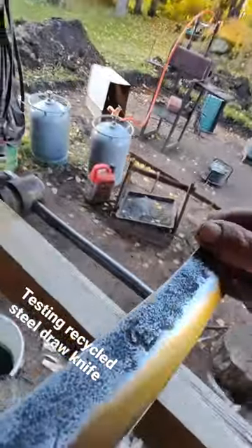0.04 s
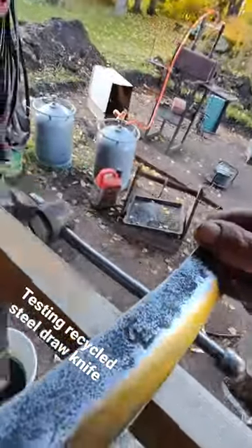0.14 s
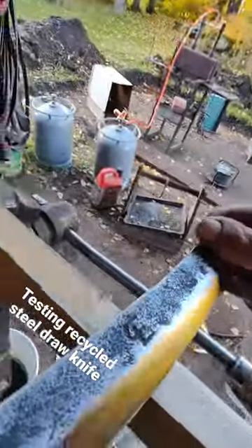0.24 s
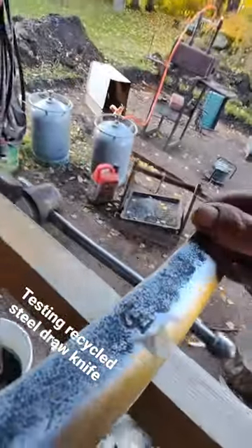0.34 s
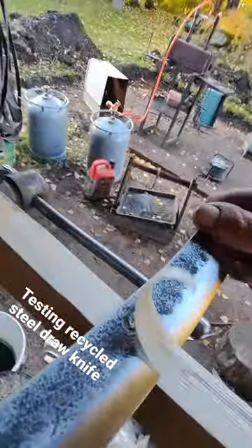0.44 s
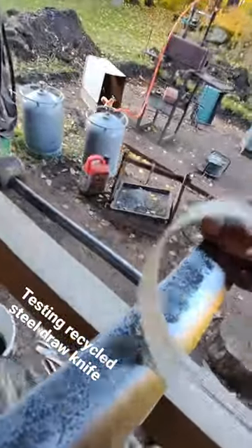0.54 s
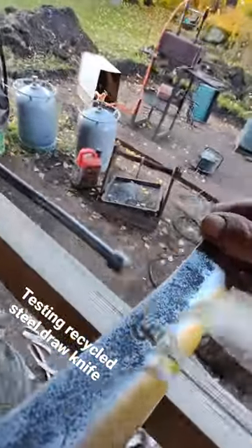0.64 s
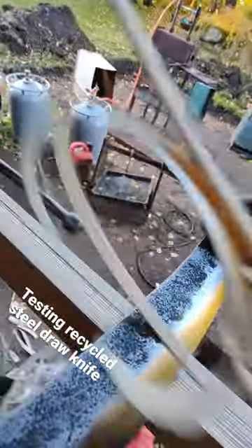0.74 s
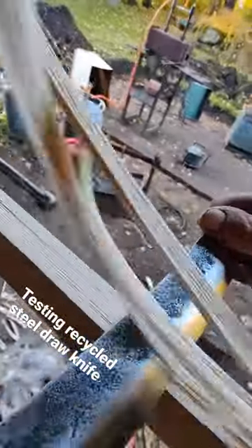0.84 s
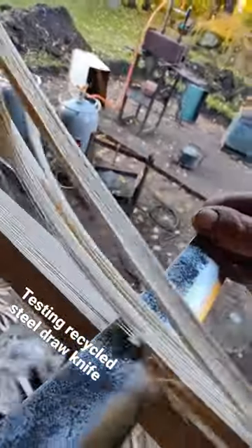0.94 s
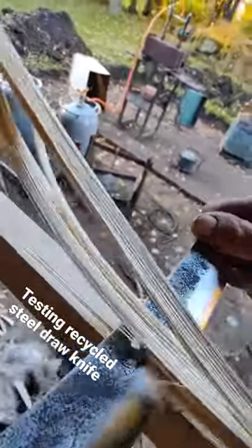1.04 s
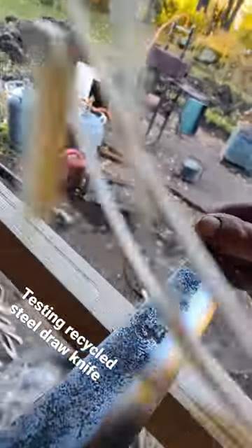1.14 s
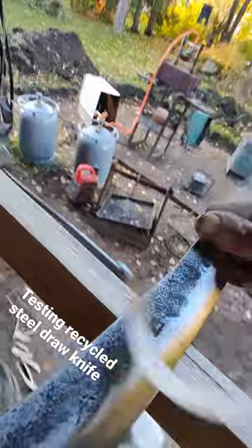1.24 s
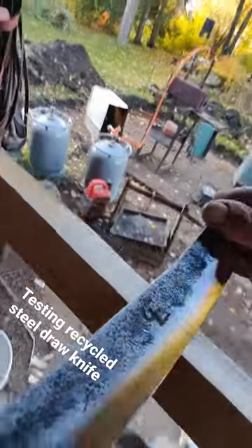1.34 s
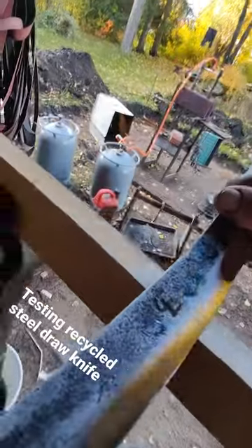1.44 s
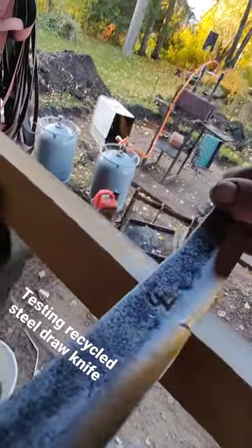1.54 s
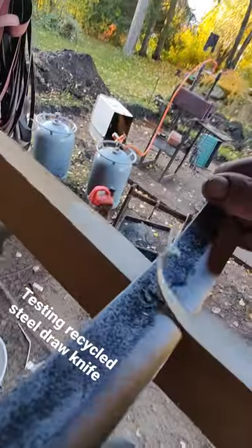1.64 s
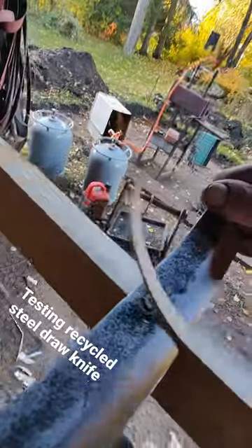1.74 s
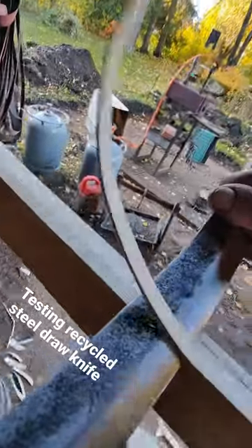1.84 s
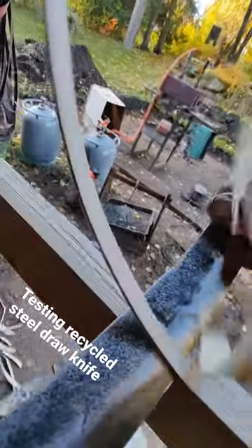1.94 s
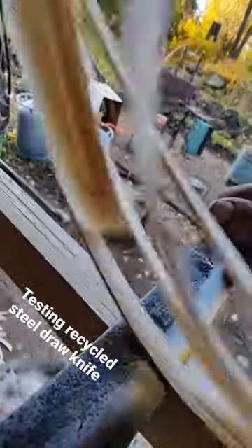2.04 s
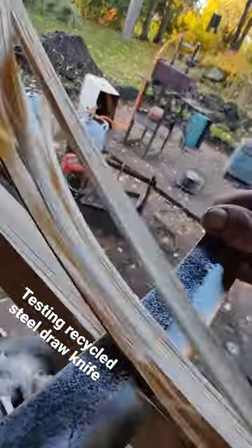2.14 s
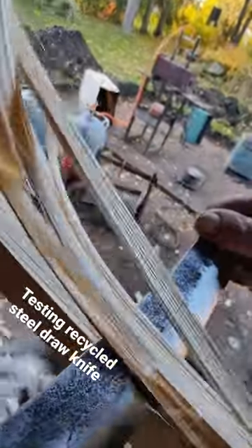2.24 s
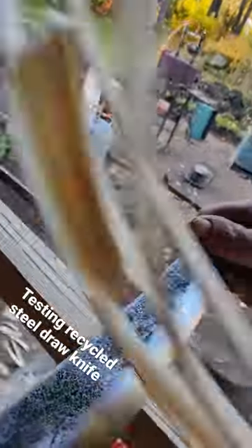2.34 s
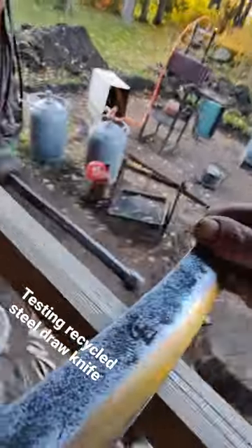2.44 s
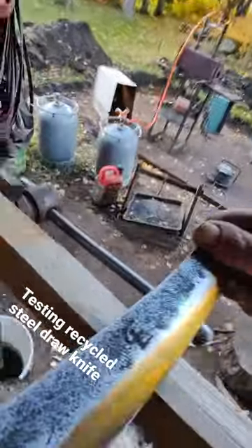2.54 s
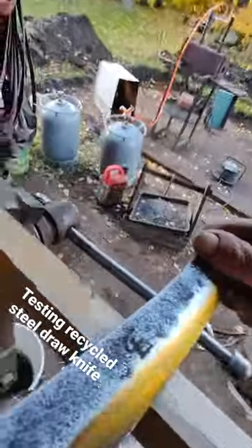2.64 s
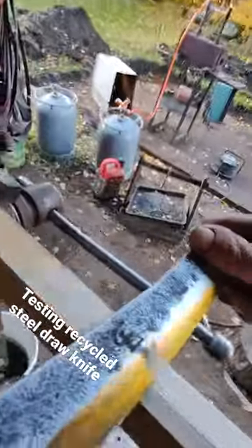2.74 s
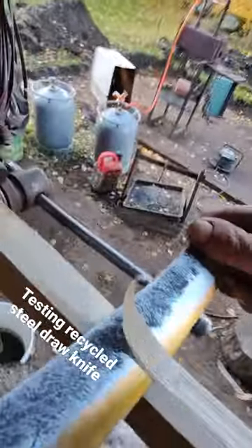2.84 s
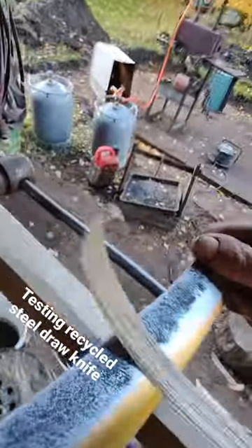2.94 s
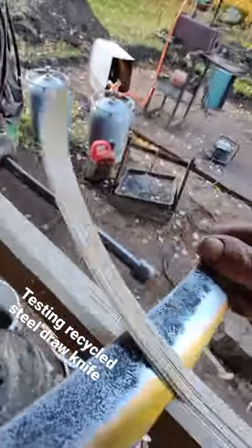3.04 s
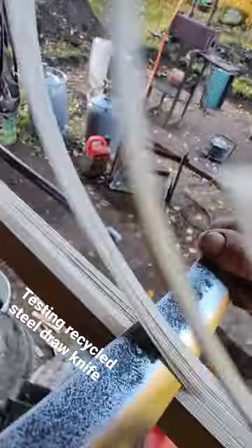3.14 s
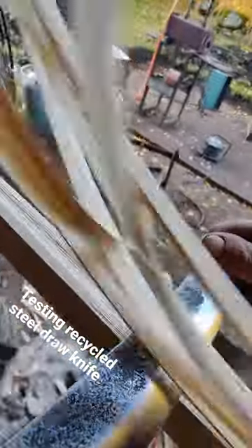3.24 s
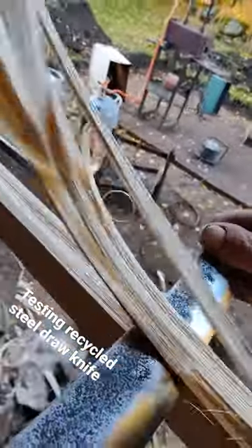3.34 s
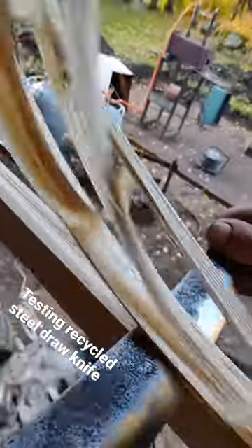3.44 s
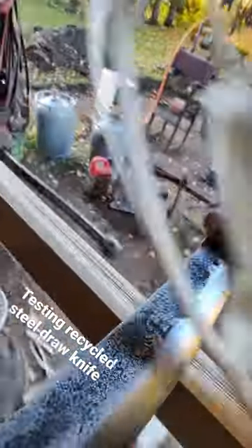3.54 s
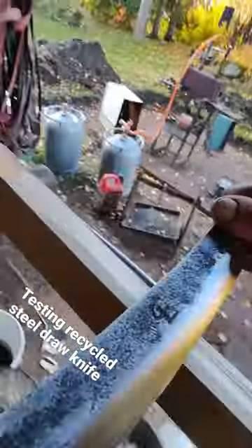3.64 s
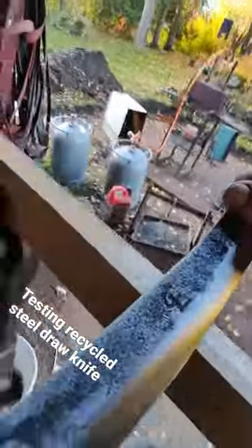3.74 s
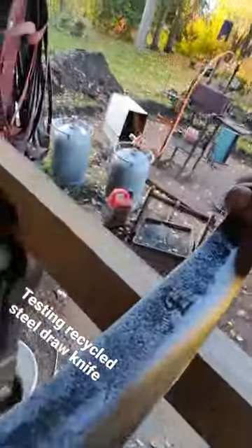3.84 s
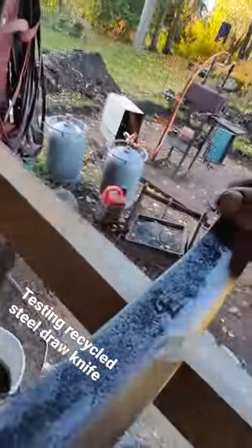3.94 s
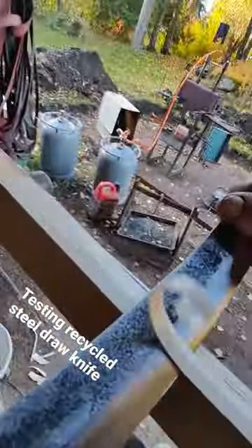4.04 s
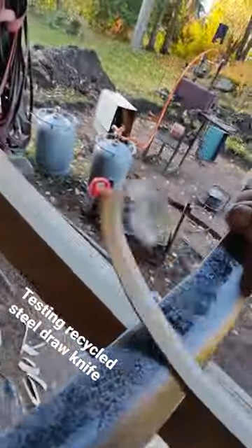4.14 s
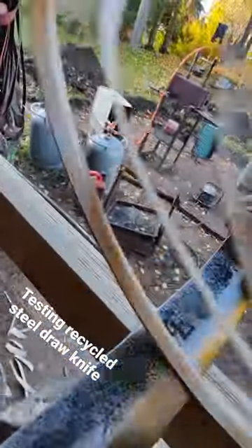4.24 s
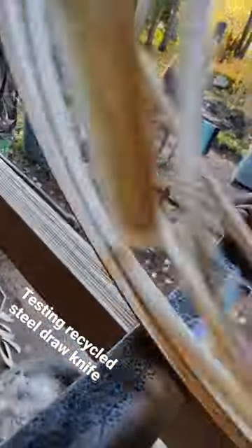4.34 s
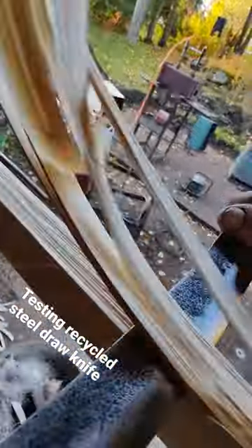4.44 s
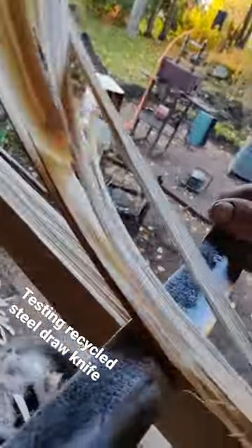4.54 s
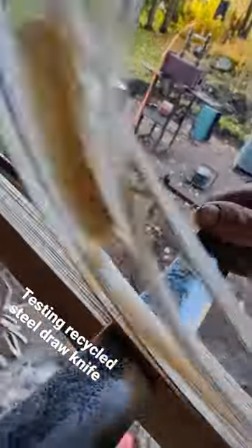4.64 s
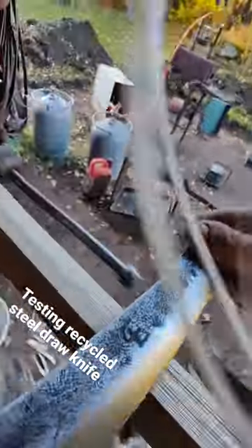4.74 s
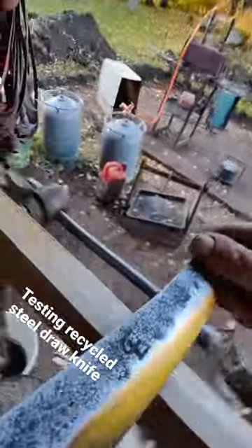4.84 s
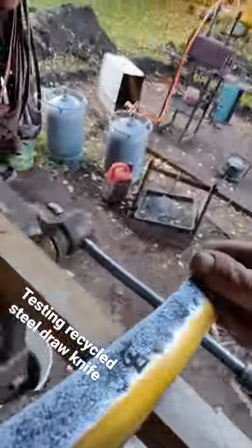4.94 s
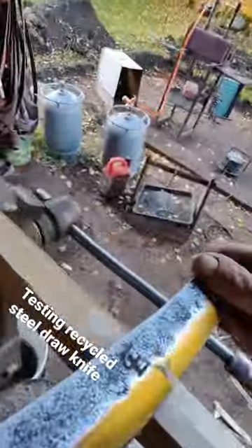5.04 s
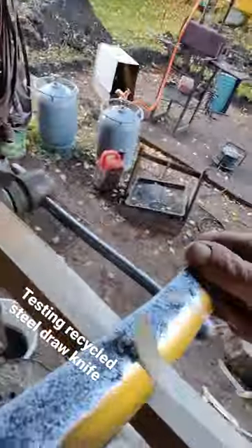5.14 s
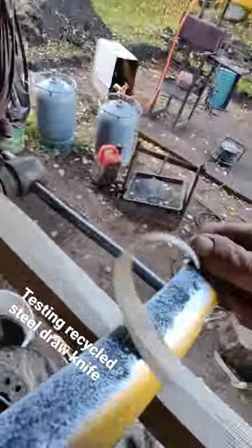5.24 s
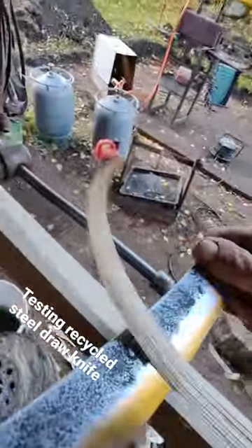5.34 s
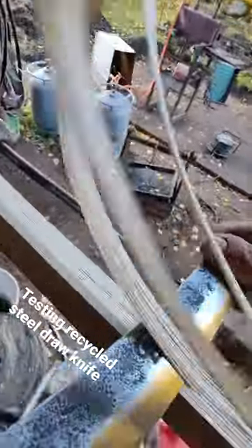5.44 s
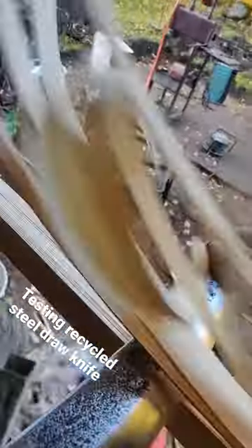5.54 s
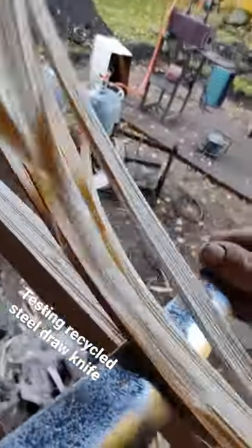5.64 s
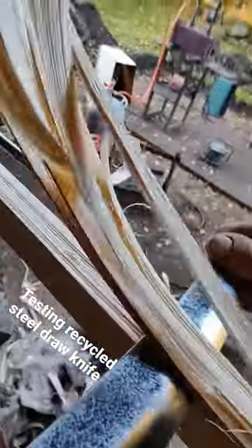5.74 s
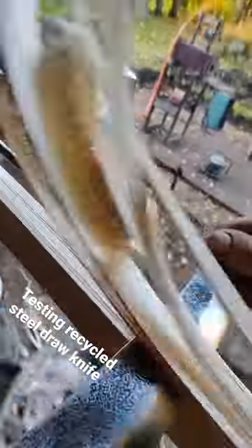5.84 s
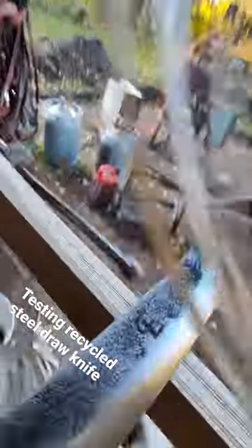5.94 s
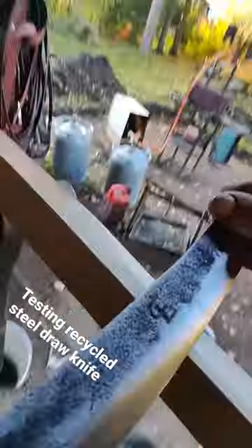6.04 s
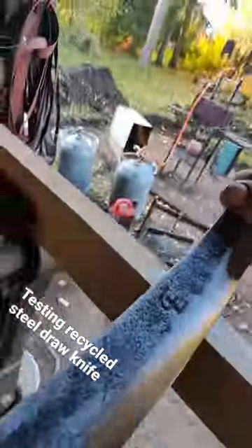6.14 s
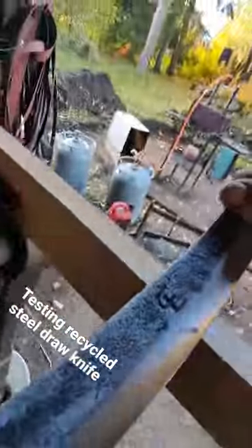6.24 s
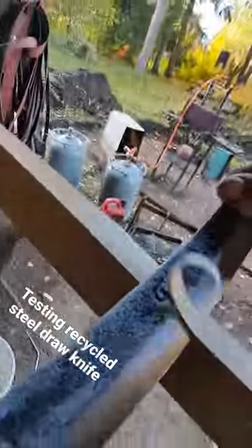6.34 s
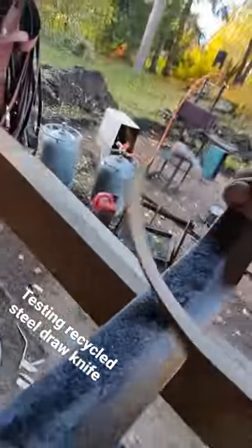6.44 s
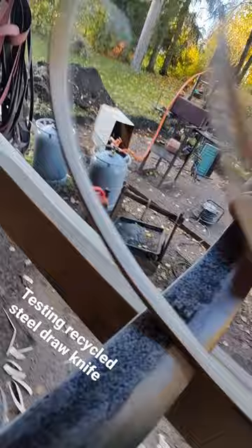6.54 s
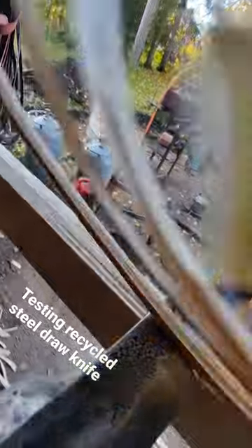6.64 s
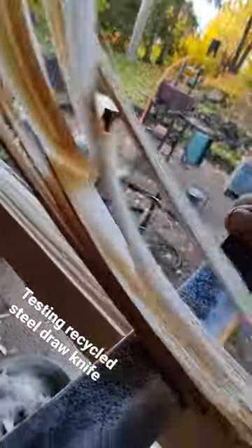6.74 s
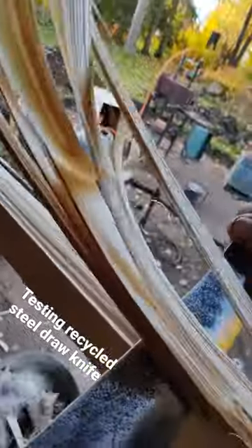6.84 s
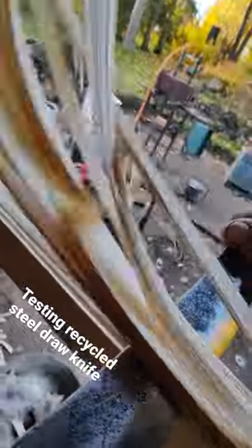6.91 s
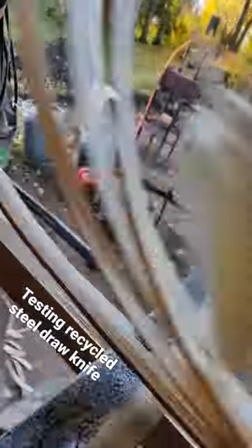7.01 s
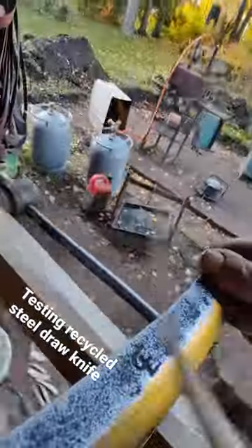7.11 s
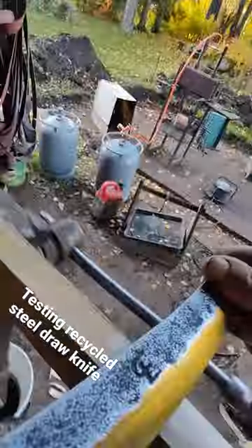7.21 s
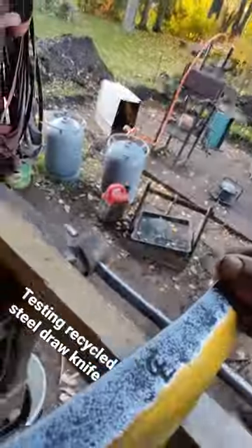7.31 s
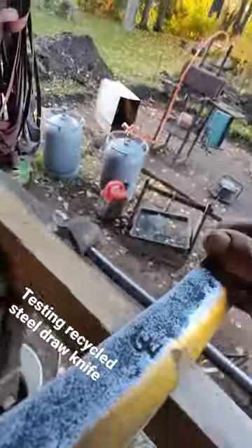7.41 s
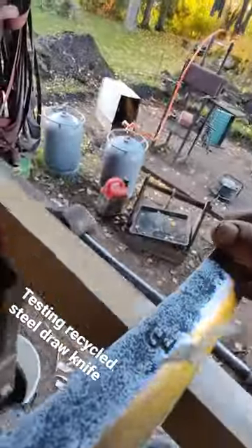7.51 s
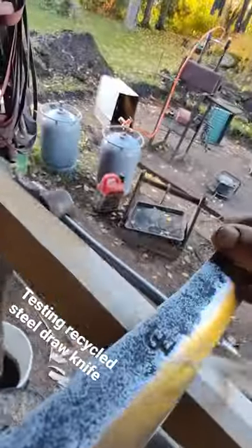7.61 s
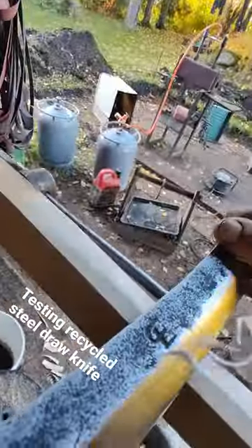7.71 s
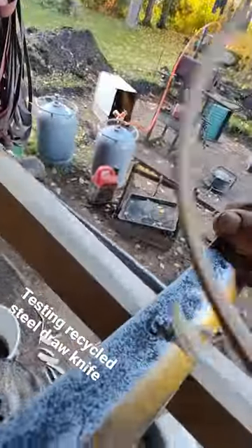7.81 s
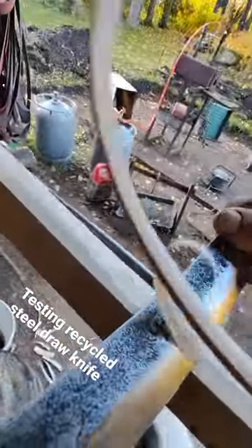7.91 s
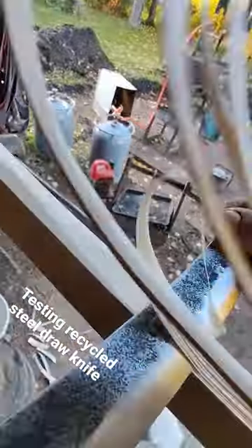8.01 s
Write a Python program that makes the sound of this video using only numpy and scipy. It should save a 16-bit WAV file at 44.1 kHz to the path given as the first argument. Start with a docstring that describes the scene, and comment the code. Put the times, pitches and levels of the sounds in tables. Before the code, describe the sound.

Outdoors, close and dry, a draw knife shaves wood in a steady rhythm, roughly one stroke every 1.2 seconds. Each gritty pull swells into bright ripping and crackling, then stops abruptly. Shavings brush and thump the microphone, the beam knocks, and the blade squeaks briefly. Quieter backward rubs fill the gaps, and the last stroke barely scrapes.

```python
"""A steel draw knife works a clamped wooden beam outdoors, right in front of the microphone.
It first slides back with a dull rub of sliding friction, as again between the later pulls; knocks ring the beam.
Then come seven pulls: stick-slip friction scrapes and judders. In the first six the edge also cuts: fibres tear
as noise bursts, the shaving sings in two drifting modes and splinters snap as ticks with damped rings.
From the first pull on, shavings bump the microphone and rustle; later blade or beam squeaks. The last pull is weak."""
import sys
import numpy as np
from scipy import signal
from scipy.fft import rfft, irfft, next_fast_len
from scipy.io import wavfile
from scipy.ndimage import map_coordinates

SR = 44100
rng = np.random.default_rng(int(sys.argv[2]) if len(sys.argv) > 2 else 0)


def master(y):
    """Save y as 16-bit WAV."""
    cut = np.clip(np.atleast_2d(y).T, -1, 1)
    pcm = np.round(cut * 32767)  # scale
    wavfile.write(sys.argv[1], SR, pcm.astype(np.int16))


N = 355887

# All levels in the tables are relative: each function adds its own trim.


def amp(db):
    """Level law: decibels to amplitude gain."""
    return 10 ** (np.asarray(db) / 20)


def unit(pair):
    """Normalisation: scale a stereo pair so that its centre has rms 1."""
    return pair / np.sqrt(np.mean(pair.mean(0) ** 2) + 1e-20)


def along(points, hz):
    """Logarithmic frequency axis: interpolate (f/Hz, value) points."""
    f, v = np.transpose(points)
    return np.interp(np.log(hz + 1), np.log(f), v)


def pan(db):
    """Intensity stereo: left and right gains, of mean 1, for a left-minus-right level in dB."""
    g = np.array([amp(db / 2), amp(-db / 2)]).reshape(2, -1)
    return g / g.mean(0)


def since(s):
    """Time origin: seconds since time s, for each sample."""
    return np.arange(N) / SR - s


def wobble(rate):
    """Band-limited fluctuation: a smooth random curve, rate knots a second."""
    knots = rng.standard_normal(int(N * rate / SR) + 4)
    return map_coordinates(knots, [np.arange(N) * rate / SR])


def filtered(x, response):
    """Linear filtering: multiply the spectrum by a response of frequency."""
    size = next_fast_len(N + 8192)
    hz = np.fft.rfftfreq(size, 1 / SR)
    return irfft(rfft(x, size) * response(hz), size)[..., :N]


def struck(x, spectrum):
    """Minimum phase: a causal colour of unit energy, so that nothing sounds before the blow."""
    hz = np.fft.rfftfreq(2048, 1 / SR)
    cepstrum = irfft(np.log(amp(along(spectrum, hz))))
    cepstrum[1:1024] *= 2  # fold the negative times onto the positive ones
    cepstrum[1025:] = 0
    ring = irfft(np.exp(rfft(cepstrum)))
    return signal.fftconvolve(x, ring[None] / np.linalg.norm(ring), axes=1)[:, :N]


# Correlation between left and right: (f/Hz, coefficient from -1 to 1)
PORT_CORRELATION = [(60, 0.13), (350, -0.68), (600, 0.21), (1050, 0.47), (1600, 0.23), (2400, -0.45),
                    (3600, -0.1), (5000, 0.017)]


def voiced(pair, spectrum, side, modes=()):
    """Source-filter principle: two excitations, coloured by a spectrum and modes, reach two partly alike ports."""
    def colour(hz):
        ring = sum(amp(db) * 1j * hz * w / (c * c - hz * hz + 1j * hz * w) for c, w, db in modes)
        fading = np.abs(ring) / (1 + (hz / 8000) ** 8)  # the modes fade in the high treble
        return np.hypot(amp(along(spectrum, hz)), fading)

    def mid_and_wide(hz):
        turn = np.arccos(np.clip(along(PORT_CORRELATION, hz), -1, 1)) / 2
        return colour(hz) * np.array([np.cos(turn), np.sin(turn)])

    mid, wide = filtered(pair, mid_and_wide)
    ports = np.array([mid + wide, mid - wide])
    return unit(filtered(ports, lambda hz: pan(along(side, hz))))


def slips(rate, spread_db, life, smooth):
    """Stick-slip: rate bursts a second, of uneven size, decaying over life s, plus smooth friction power."""
    happens = rng.random(N) < rate / SR
    sizes = happens * amp(spread_db * rng.standard_normal(N).clip(-2.4, 2.4))
    power = signal.lfilter([1], [1, -np.exp(-2 / (life * SR))], sizes ** 2)
    return np.sqrt(power / power.mean() + smooth) * rng.standard_normal((2, N))


def shifting(pair, cell_hz, rate, depth_db):
    """Moving contact: resonances come and go as the edge travels along the wood."""
    hz, t, z = signal.stft(pair, SR, nperseg=1024)
    knots = rng.standard_normal((int(hz[-1] / cell_hz) + 3, int(t[-1] * rate) + 3))
    field = map_coordinates(knots, np.meshgrid(hz / cell_hz, t * rate, indexing="ij"), order=1)
    return unit(signal.istft(z * amp(depth_db * field.clip(-2, 2)), SR, nperseg=1024)[1][:, :N])


def add(track, s, sound):
    """Superposition: mix a short stereo sound in at time s."""
    part = track[:, max(round(s * SR), 0):][:, :sound.shape[1]]
    part += sound[:, :part.shape[1]]


def burst(t60, tail_db, tail_t60):
    """Two-stage decay: a sharp stereo noise burst with a weaker, longer tail."""
    t = np.arange(SR // 5) / SR
    decay = amp(-60 * t / t60) + amp(tail_db - 60 * t / tail_t60)
    return decay * rng.standard_normal((2, len(t)))


def ping(hz, t60):
    """Damped oscillator: one mode, reaching the two ports in unrelated phase."""
    t = np.arange(SR // 5) / SR
    onset = 1 - np.exp(-2 * hz * t)
    return np.sin(2 * np.pi * (hz * t + rng.random((2, 1)))) * amp(-60 * t / t60) * onset


def crackle(rate, spread_db):
    """Shot noise: single fibres, rate a second, each ring for a few cycles at their own pitch."""
    draws = rng.random((int(rate * N / SR), 4))
    start = (draws[:, :1] * (N - 128)).astype(int)
    hz = 1700 * (15000 / 1700) ** draws[:, 1:2] ** .7
    size = amp(spread_db * -np.log(draws[:, 2:3]).clip(-3.5, 0))  # few are loud
    n = np.arange(128)
    cycles = hz * n / SR
    ports = []
    for port in range(2):
        grains = size * np.exp(-cycles / 6.8) * np.sin(2 * np.pi * (cycles + port * draws[:, 3:]))
        ports.append(np.bincount((start + n).ravel(), grains.ravel(), N))
    return unit(np.array(ports))


# Spectrum of the open air: (f/Hz, level/dB)
AIR_SPECTRUM = [(15, -54), (25, 5.5), (71, 5), (582, -12), (2230, -19.5), (2490, -24), (4380, -26.5),
                (6050, -23), (9300, -45), (15500, -43)]


def air():
    """Stationary noise: a faint open-air background whose level wanders slowly."""
    noise = voiced(rng.standard_normal((2, N)), AIR_SPECTRUM, [(100, -5), (8000, -2)])
    return amp(-49.0 + 1.7 * wobble(3.88)) * noise


# The knife is pushed back, pressing hardest once on the way: (start t/s, length t/s, sliding level/dB,
# hardest after t/s, width of that press t/s, its body level/dB, its rub level/dB)
RETURN_STROKES = [(-.06, 0.41, -44.5, 0.2, 0.085, -39.5, -42.5),
                  (1.21, 0.4, -46.5, .25, 0.058, -37.5, -40.5),
                  (2.412, 0.35, -43, 0.21, 0.064, -37.5, -36.5),
                  (3.568, 0.39, -46, 0.22, 0.051, -35.5, -43.5),
                  (4.71, 0.3, -44.5, 0.23, 0.077, -36.5, -36.5), (5.872, 0.46, -45.5, 0.26, 0.04, -38, -41),
                  (7.016, 0.44, -48.5, 0.2, 0.06, -33.5, -41)]
SLIDE_ARCH = 0.69  # exponent of level against speed
SLIDE_BODY_DB = -1.5  # the beam's share of the light sliding


def return_gains():
    """Speed and load dependence of friction: an arch of sliding speed plus one swell of pressure."""
    body, rub = np.zeros((2, N))
    for s, length, slide_db, after, width, body_db, rub_db in RETURN_STROKES:
        t = since(s)
        speed = np.abs(np.sin(np.pi * (t / length).clip(0, 1)))
        slide = amp(slide_db) * speed ** SLIDE_ARCH
        press = np.exp(-((t - after) / width) ** 2)
        body += amp(SLIDE_BODY_DB) * slide + amp(body_db) * press
        rub += slide + amp(rub_db) * press
    return body, rub


# Spectra of the beam's body and of the rub on the way back: (f/Hz, level/dB)
BODY_SPECTRUM = [(25, -33), (80, 1.5), (160, -1), (280, 3), (370, 3.5), (430, -5), (510, 1.5), (660, -10),
                 (850, -13), (1500, -93)]
RUB_SPECTRUM = [(400, -13), (900, -45), (1500, 7), (3800, -1), (4500, -1), (7000, -5.5), (8200, -34),
                (11000, -17.5), (15500, -32)]
# Resonances on the way back: (f/Hz, width f/Hz, level/dB)
RUB_MODES = [(1166, 230, 10.5), (1660, 380, 3.5), (2495, 93, 14.5), (3205, 160, 7.5), (3530, 110, -8.5),
             (5000, 130, -16), (5860, 580, 4.5)]
# Left minus right for rubbing, juddering and scraping: (f/Hz, level/dB)
FRICTION_SIDE = [(100, -11), (500, -14), (800, -6), (1200, -12), (2400, -14), (5000, -11), (12000, -5.5)]


def returns():
    """Sliding friction: the knife is pushed back over the wood without biting."""
    body = voiced(slips(rate=260, spread_db=4, life=0.0012, smooth=1.0), BODY_SPECTRUM, FRICTION_SIDE)
    rub = slips(rate=1200, spread_db=5.5, life=0.0015, smooth=1.0)
    rub = voiced(rub, RUB_SPECTRUM, FRICTION_SIDE, RUB_MODES)
    rub = shifting(rub, cell_hz=129.6, rate=24, depth_db=6)
    body_gain, rub_gain = return_gains()
    return body * body_gain * amp(-3.0) + rub * rub_gain * amp(-0.46)


# The blade knocks on the beam: (t/s, level/dB, ring f/Hz)
BEAM_KNOCKS = [(0.084, -23, 338), (0.599, -30, 250), (0.715, -15.5, 233), (1.013, -19.5, 248),
               (1.334, -33, 274), (1.43, -25.5, 545), (1.505, -26.5, 283), (2.018, -21.5, 262),
               (2.178, -19, 274), (3.005, -20, 315), (3.777, -20, 340), (4.962, -19.5, 351),
               (4.966, -19.5, 644), (6.513, -19.5, 228.6), (7.316, -22.5, 217), (7.854, -27.5, 235)]
# Spectrum of the blow: (f/Hz, level/dB)
KNOCK_SPECTRUM = [(40, 9), (120, 5.5), (300, 6), (550, -16), (1000, -9.5), (2000, -23.5), (6000, -64.5)]


def knocks():
    """Impact excitation: the blade catches and the clamped beam answers dully."""
    blows, rings = np.zeros((2, 2, N))
    for s, db, hz in BEAM_KNOCKS:
        add(blows, s, amp(db - 9.5) * burst(t60=0.058, tail_db=-5.5, tail_t60=0.38))
        add(rings, s, amp(db - 1.5) * ping(hz, t60=0.067))
    return (struck(blows, KNOCK_SPECTRUM) + rings) * pan(-9.5)


# Short tinks of the steel blade: (t/s, level/dB, f/Hz)
BLADE_TINKS = [(.304, -32, 1570), (1.599, -38.5, 1520), (3.652, -37.5, 1030), (6.943, -27, 2190)]
# Splinters breaking: (t/s, level/dB, ring of the splinter f/Hz)
SPLINTER_SNAPS = [(0.5993, -16, 5430), (0.653, -22, 6030), (0.7164, -11, 6000), (1.0103, -11.5, 1880),
                  (2.016, -14, 1830), (2.0715, -19, 6940), (2.208, -8, 5600), (2.2433, -11, 4890),
                  (2.2696, -9.5, 4930), (2.8983, -20, 6270), (2.923, -15.5, 6170), (2.9936, -15, 6470),
                  (3.1237, -10.5, 2460), (3.1526, -10.5, 6280), (3.1908, -13, 6960), (3.2525, -15, 6440),
                  (3.3174, -10, 6500), (4.2722, -18, 1770), (4.3864, -13, 1820), (4.4135, -6.5, 6500),
                  (4.4638, -12, 5550), (4.5292, -9, 2420), (5.5383, -13, 6490), (5.6022, -9.5, 6440),
                  (5.6734, -11, 5950), (5.746, -16, 4050), (6.5139, -13, 1990), (6.5989, -17, 1740),
                  (6.7477, -9.5, 2583), (6.7647, -14, 4880), (6.8434, -11, 6100), (6.8536, -8, 5900),
                  (7.5936, -25, 2410)]
# Spectrum of the tick: (f/Hz, level/dB)
SNAP_SPECTRUM = [(300, -5), (1500, -12.5), (2600, 4.5), (4000, -4.5), (6300, 9), (8200, -5.5),
                 (11000, -5.5), (15500, -5.5)]


def snaps():
    """Impulsive excitation: a splinter ticks and rings briefly; the blade tinks with little tick."""
    ticks, rings = np.zeros((2, 2, N))
    for s, db, hz in SPLINTER_SNAPS:
        add(ticks, s, amp(db - 5) * burst(t60=0.0086, tail_db=-12.5, tail_t60=0.11))
        add(rings, s, amp(db - 8.5) * ping(hz, t60=0.027))
    for s, db, hz in BLADE_TINKS:
        add(rings, s, amp(db) * ping(hz, t60=0.03))
        add(ticks, s, amp(db - 11) * burst(t60=0.0077, tail_db=-16, tail_t60=0.068))
    both = struck(ticks, SNAP_SPECTRUM) + rings
    return filtered(both, lambda hz: pan(along([(2000, -12), (6000, -1.5)], hz)))


# The blade is set down on the wood: (peak t/s, level/dB, ring f/Hz)
BLADE_SCUFFS = [(0.354, -34, 1610), (1.239, -50, 2320), (2.429, -37.5, 5870), (7.089, -37.5, 1690),
                (7.799, -34, 2500)]
SCUFF_ATTACK_S, SCUFF_DECAY_S = 0.0033, 0.016


def scuffs():
    """Transient friction: the edge lands flat, a soft burst through one broad resonance."""
    out, t = np.zeros((2, N)), np.arange(-SR // 25, SR // 12) / SR
    swell = np.exp(np.minimum(t / SCUFF_ATTACK_S, -t / SCUFF_DECAY_S))
    for s, db, hz in BLADE_SCUFFS:
        grit = rng.standard_normal((2, len(t)))
        ring = signal.lfilter(*signal.iirpeak(hz, 6, fs=SR), grit)
        add(out, s + t[0], amp(db) * swell * (unit(ring) + 2.54 * unit(grit)))
    return filtered(out, lambda hz: amp(along([(6500, -8.5), (9000, -23.5)], hz))) * pan(-9.5)


STOP_DB_PER_S = 340  # the arms brake at the end


def braking_db(t, length):
    """Exponential decay: everything fades fast once the pull has run its length."""
    return -STOP_DB_PER_S * np.maximum(t - length, 0)


# The knife is drawn along the beam; twice it stalls and is taken up again:
# (start t/s, length t/s, time to firm up t/s, shudder of the bench level/dB, judder level/dB,
# scrape level/dB, tearing level/dB)
PULL_STROKES = [(.395, 0.644, 0.068, -32.5, -32, -37.5, -42), (1.644, 0.622, 0.11, -33, -36, -35, -38),
                (2.808, 0.61, 0.073, -37.5, -37, -37, -39), (3.98, 0.58, 0.12, -39, -32, -34, -35.5),
                (5.125, 0.19, 0.048, -28.5, -33, -40.5, -39.5),
                (5.344, 0.41, 0.049, -34, -35, -37.5, -35.5), (6.353, .5, 0.08, -35, -32, -36.5, -36.5),
                (7.456, .28, 0.03, -49, -51, -53, -62), (7.745, .33, 0.051, -50, -45, -48.5, -51)]
SLACK_DB = 23  # how far under full effort a pull starts
TEAR_GROWS = 2.04  # tearing swings wider than the effort
TEAR_LAG_S = 0.0081  # the shaving slides on a little after the blade has stopped


def pull_gains():
    """Common driving force: shudder, judder, scrape and tearing follow one effort that firms up, holds and stops."""
    gains = np.zeros((4, N))
    for s, length, rise, shudder_db, judder_db, scrape_db, tear_db in PULL_STROKES:
        t = since(s)
        effort_db = -SLACK_DB * np.exp(-np.maximum(t / rise, -2))
        friction = amp([[shudder_db], [judder_db], [scrape_db]])
        gains[:3] += friction * amp(effort_db + braking_db(t, length))
        gains[3] += amp(tear_db + TEAR_GROWS * effort_db + braking_db(t, length + TEAR_LAG_S))
    return gains


# The edge digs in and a shaving splits off: (start t/s, length t/s, tearing level/dB,
# easing of the friction level/dB, high ring level/dB, low ring level/dB, high ring f/Hz, its fall in Hz per s)
SHAVING_CUTS = [(0.657, 0.045, -36, 1.5, -33, -46, 5820, 100),
                (2.11, 0.13, -40, 3, -27.5, -31.5, 6600, 8970),
                (3.169, 0.18, -31, 4, -28, -27.5, 6565, 2770),
                (4.401, .15, -42, 4.5, -29.5, -28, 6305, 6880),
                (5.524, .19, -31.5, 1.5, -28.5, -24, 6416, 5010),
                (6.631, 0.2, -33.5, 2, -32.5, -28.5, 6150, 100)]
CUT_ATTACK_S, CUT_RELEASE_S = 0.033, 0.041


def cut_controls():
    """Lengthening resonator: a cut deepens, holds and runs out or stops with its pull; its high ring falls."""
    gains, ease_db, ring_hz = np.zeros((3, N)), np.zeros(N), np.zeros(N)
    for s, length, tear_db, eased_db, high_db, low_db, hz, fall in SHAVING_CUTS:
        t = since(s)
        pull_s, pull_length = max(row[:2] for row in PULL_STROKES if row[0] < s)  # the latest pull begun
        depth = np.exp(np.minimum(t, 0) / CUT_ATTACK_S - np.maximum(t - length, 0) / CUT_RELEASE_S)
        depth *= amp(braking_db(since(pull_s), pull_length))
        gains += amp([[tear_db], [high_db], [low_db]]) * depth
        ease_db += eased_db * depth
        ring_hz = np.where(since(pull_s) > 0, hz - fall * t.clip(0, 2 * length), ring_hz)
    return (*gains, ease_db, ring_hz)


# Spectra of juddering, scraping and tearing: (f/Hz, level/dB)
JUDDER_SPECTRUM = [(25, -18), (60, -6), (105, 6), (170, -7.5), (230, 3), (330, -4.5), (420, -6), (520, -17),
                   (680, -27.5), (950, -36.5), (1600, -53.5)]
SCRAPE_SPECTRUM = [(400, -29), (900, -104), (2000, -6), (4000, -17.5), (7000, -12), (8500, -24),
                   (16000, -53)]
TEAR_SPECTRUM = [(700, -63.5), (1500, -1), (2100, -25), (2500, 2.5), (3200, 0.5), (4200, 0.5), (5400, 1),
                 (6600, 6), (8000, -10), (10000, -3.5), (12500, -9), (14500, -4), (15400, -2.5)]
# Resonances of blade and beam under the pull: (f/Hz, width f/Hz, level/dB)
SCRAPE_MODES = [(1144, 33, -1), (1290, 200, -1.5), (1745, 118, 3.5), (2445, 126, 1), (3074, 43, 0),
                (4760, 56, -6), (5450, 59, -1.5), (5700, 190, -4)]
# Left minus right for tearing: (f/Hz, level/dB)
FIBRE_SIDE = [(2500, -6.5), (3600, -9.5), (4800, -2.5), (12000, -2)]
BENCH_HZ = 140  # the bench shudders below this, the beam judders above


def pulls():
    """Stick-slip and fracture: the blade judders on the beam, scrapes along the grain and tears fibres."""
    grain = wobble(70)  # harder and softer wood passing under the edge
    shudder_gain, judder_gain, scrape_gain, tear_gain = pull_gains()
    cut_gain, _, _, ease_db, _ = cut_controls()

    judder = slips(rate=170, spread_db=-2.5, life=0.0039, smooth=0.5)
    judder = voiced(judder, JUDDER_SPECTRUM, FRICTION_SIDE)
    judder = shifting(judder, cell_hz=58.0, rate=20, depth_db=8.0)
    shudder = filtered(judder, lambda hz: 1 / (1 + (hz / BENCH_HZ) ** 6))
    shaking = shudder * shudder_gain + (judder - shudder) * judder_gain

    scrape = slips(rate=640, spread_db=3.5, life=0.0011, smooth=1.0)
    scrape = voiced(scrape, SCRAPE_SPECTRUM, FRICTION_SIDE, SCRAPE_MODES)
    scrape = shifting(scrape, cell_hz=109.7, rate=22, depth_db=6.5)

    tear = voiced(slips(rate=600, spread_db=5, life=.0016, smooth=1.0), TEAR_SPECTRUM, FIBRE_SIDE)
    tear = shifting(tear, cell_hz=150.7, rate=22, depth_db=8.5)
    tear = shifting(tear, cell_hz=838, rate=35, depth_db=1.5)
    fibres = filtered(crackle(rate=2000, spread_db=6.5), lambda hz: pan(along(FIBRE_SIDE, hz)))
    tear = tear + amp(-10.5) * fibres

    return (shaking * amp(1.0 + 0.19 * grain - ease_db)
            + scrape * scrape_gain * amp(2.5 + 1.44 * grain - ease_db)
            + tear * np.hypot(tear_gain, cut_gain) * amp(4.5 + 1.4 * grain))


# Bumps on the microphone: (t/s, level/dB, f/Hz, left-minus-right level/dB)
MICROPHONE_BUMPS = [(.598, -12.5, 72.5, -15), (1.16, -34.5, 93, -10), (1.614, -30, 71.5, -16),
                    (2.178, -16.5, 63, 22), (2.268, -19, 47.63, -8), (2.791, -32, 61.4, -26),
                    (3.111, -6.5, 45.4, 29), (3.958, -30.5, 88, -18), (4.529, -20, 48, 19),
                    (5.632, -13.5, 35.6, 22), (6.32, -32, 70, -19), (6.751, -21, 54, 14),
                    (6.858, -27, 91, 15)]


def bumps():
    """Direct contact: a touch on the microphone gives a short push and a few damped low swings."""
    out, t = np.zeros((2, N)), np.arange(SR // 4) / SR
    u = t / 0.0008  # the push peaks after 0.8 ms
    push = 2.1 * u * np.exp(-u)
    for s, db, hz, side_db in MICROPHONE_BUMPS:
        swing = np.sin(2 * np.pi * hz * t) * amp(-60 * t / 0.087)
        add(out, s, amp(db) * pan(side_db) * (push - swing))
    return out


def gliding(fibres, width_hz, ring_hz):
    """Amplitude modulation: narrow-band fibre bursts ride on a carrier of moving pitch."""
    narrow = filtered(fibres, lambda hz: 1 / (1 + 1j * hz / width_hz) ** 3)
    return unit(narrow * np.cos(2 * np.pi * np.cumsum(ring_hz) / SR))


LOW_RING_HZ, LOW_RING_DRIFT_HZ = 2437, 170


def shavings():
    """Modal excitation: breaking fibres ring two modes of the shaving, the high one falling, the low one wandering."""
    _, high_gain, low_gain, _, high_hz = cut_controls()
    low_hz = LOW_RING_HZ + LOW_RING_DRIFT_HZ * wobble(14)
    high = slips(rate=310, spread_db=8.5, life=0.0036, smooth=0.47)
    high = gliding(high, width_hz=710, ring_hz=high_hz)
    low = slips(rate=750, spread_db=7, life=0.0046, smooth=0.47)
    low = gliding(low, width_hz=420, ring_hz=low_hz)
    return high * high_gain * amp(-2.0) * pan(-0.36) + low * low_gain * amp(-13.5) * pan(-20.5)


RUSTLE_DB, RUSTLE_AFTER_S, RUSTLE_WIDTH_S = -59.5, 0.23, 0.12


def rustle():
    """Random micro-impacts: loose shavings brush each other as they settle after each pull or stall."""
    swell = np.zeros(N)
    for s, length, *_ in PULL_STROKES:
        swell += np.exp(-((since(s + length) - RUSTLE_AFTER_S) / RUSTLE_WIDTH_S) ** 2)
    return amp(RUSTLE_DB) * swell * crackle(rate=4600, spread_db=4.5) * pan(-2.5)


# Blade or beam squeaks faintly: (middle t/s, half-length t/s, level/dB, f/Hz)
FRICTION_SQUEAKS = [(2.526, 0.04, -40.5, 2640), (2.858, 0.036, -50, 2500), (3.106, 0.073, -38.5, 2410),
                    (4.31, 0.08, -37, 1140), (4.962, 0.051, -38, 994), (5.023, 0.073, -47.5, 2455),
                    (5.207, 0.14, -44, 2420), (5.482, 0.098, -35.5, 2484), (6.116, 0.051, -40, 1250),
                    (6.135, 0.055, -42.5, 2500), (6.638, 0.032, -31.5, 1167), (7.235, 0.056, -38.5, 1210),
                    (7.976, 0.11, -47, 2540)]


def squeaks():
    """Self-excited oscillation: friction feeds one mode of the blade or of the beam for a moment, unsteadily."""
    out, t = np.zeros((2, N)), np.arange(N) / SR
    flutter = np.array([wobble(110) + 1j * wobble(110) for port in range(2)])
    for s, half_length, db, hz in FRICTION_SQUEAKS:
        near = np.abs(t - s) < half_length
        swell = np.cos(np.pi / 2 * (t[near] - s) / half_length) ** 2
        tone = (flutter[:, near] * np.exp(2j * np.pi * hz * t[near])).real
        out[:, near] += amp(db) * swell * tone
    return out * pan(-19)


def scene():
    """Free field: every source is close and dry, for there are no walls."""
    background = air()
    strokes = returns() + pulls() + shavings() + rustle() + squeaks()
    impacts = knocks() + snaps() + scuffs() + bumps()
    return background + strokes + impacts


TOP_HZ = 15680


def record(dry):
    """Band limitation: a steep low-pass leaves almost nothing above TOP_HZ."""
    return filtered(dry, lambda hz: 1 / (1 + (hz / TOP_HZ) ** 120))


dry = scene()
out = record(dry)
master(out)
```